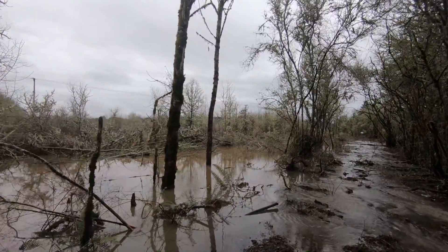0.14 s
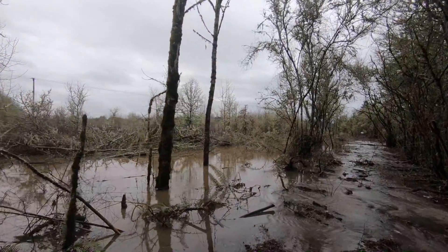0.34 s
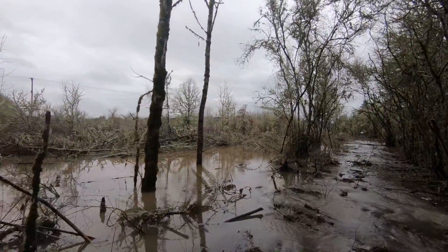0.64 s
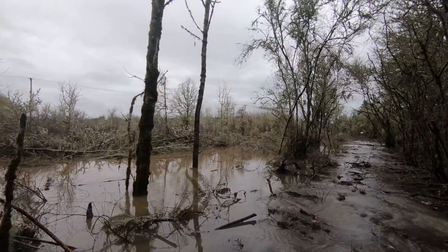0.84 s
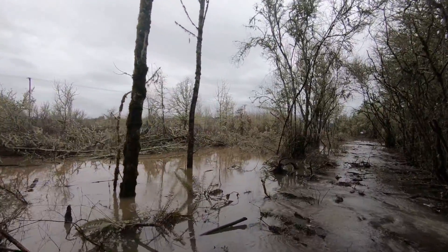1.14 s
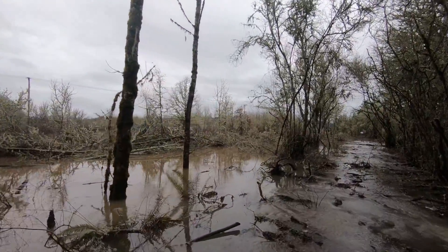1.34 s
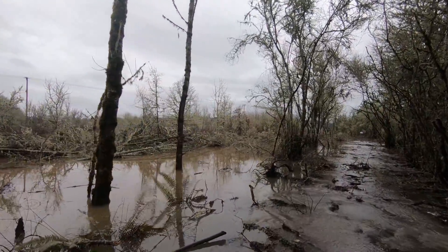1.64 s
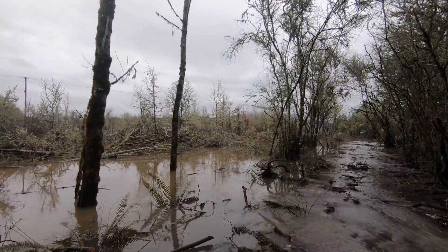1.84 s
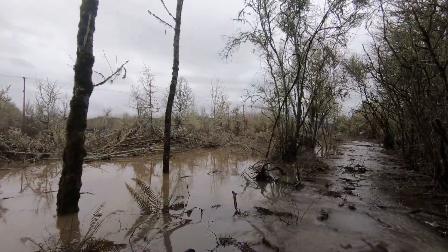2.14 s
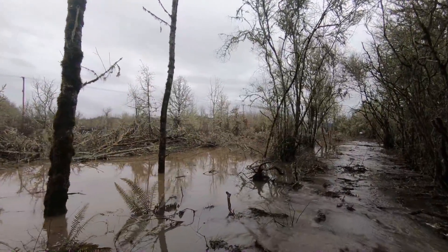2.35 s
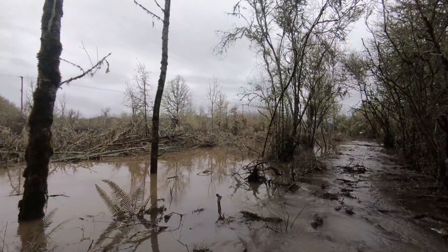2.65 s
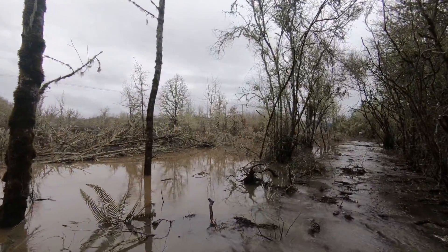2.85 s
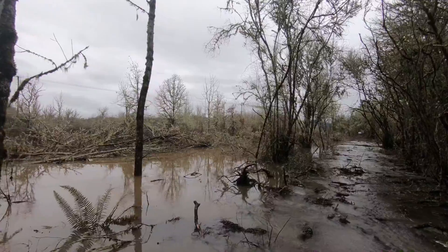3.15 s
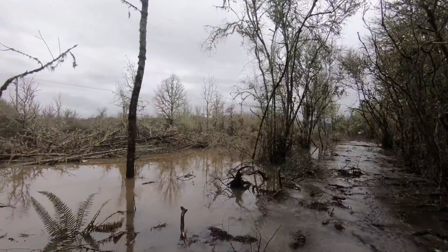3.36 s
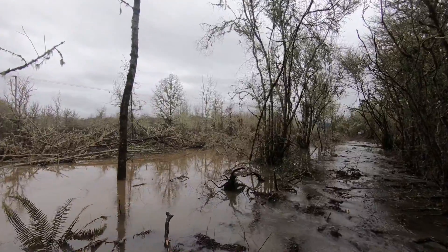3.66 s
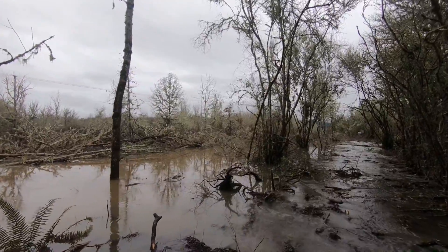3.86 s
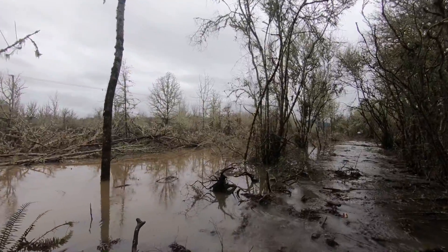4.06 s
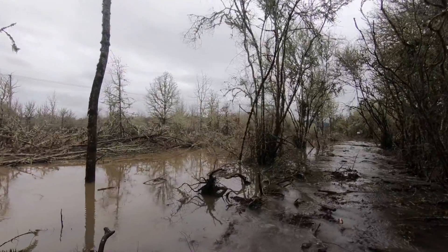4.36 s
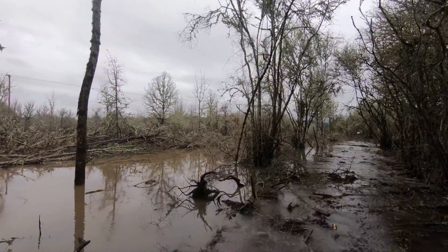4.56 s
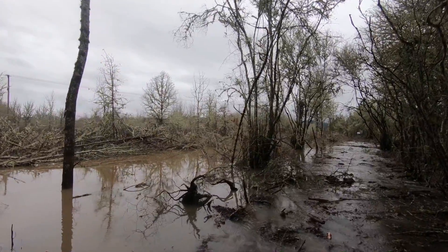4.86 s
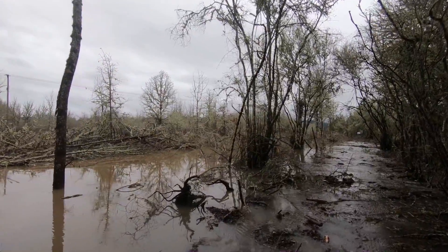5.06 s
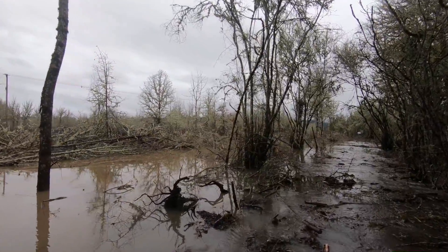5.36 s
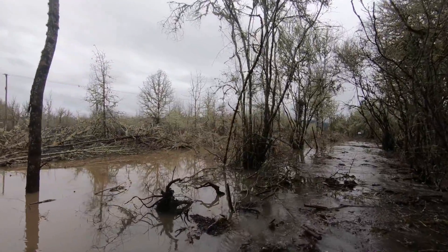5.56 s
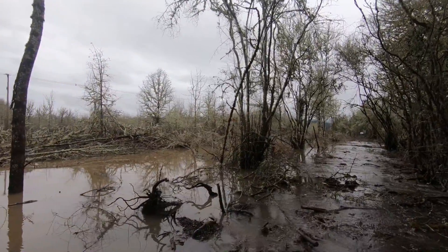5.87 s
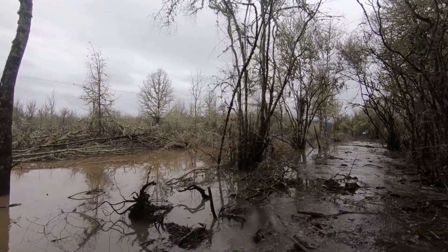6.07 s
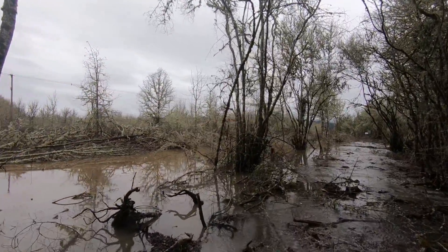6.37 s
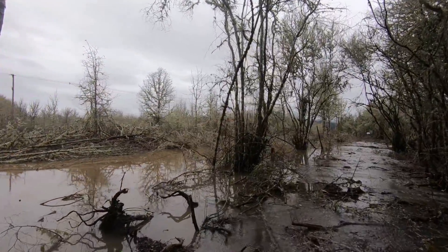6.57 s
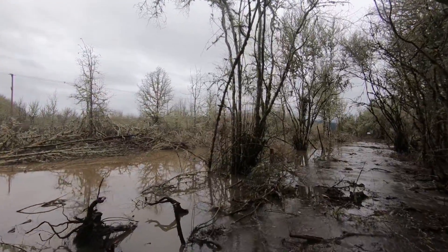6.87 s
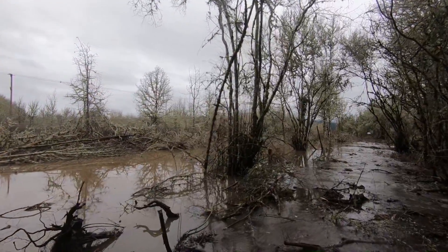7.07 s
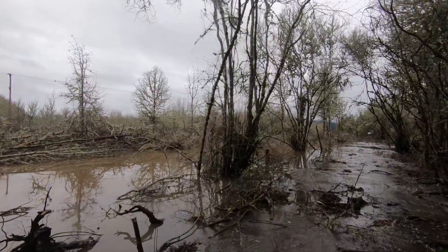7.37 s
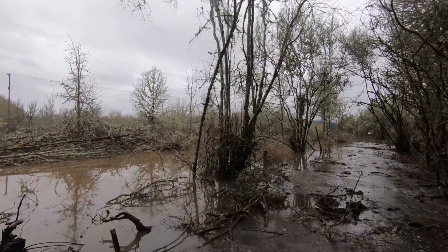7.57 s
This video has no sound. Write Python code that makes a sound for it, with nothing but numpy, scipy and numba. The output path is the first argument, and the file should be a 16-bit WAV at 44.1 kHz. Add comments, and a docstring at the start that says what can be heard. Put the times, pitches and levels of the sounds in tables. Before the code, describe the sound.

Someone wades along a flooded muddy path. Crisp splashes and wet slaps come in separate steps, with low thuds, gurgling slosh and small bubble pops. Quieter trickling fills the gaps, over soft wind and faint hiss. Splashing grows denser in the second half. A carried camera hears it close, slightly boxy, with dull highs and almost no stereo width.

```python
"""Water stirred by boots wading along a flooded, muddy path: crowds of damped sines make spray, gurgle and slosh.
Shaped noise bursts add slaps and mud thuds; single damped sines add bursting bubbles and sharp cracks of water.
Noise bands make soft swishes of cloth and trailing water, and wind with a far hiss fills the gaps.
The walker carries a small camera whose housing filters everything: dips near 560 and 1090 Hz,
a broad ring near 5 kHz and a dull top."""
import sys
import numpy as np
from scipy import signal
from scipy.fft import rfft, irfft
from scipy.io import wavfile
from scipy.ndimage import uniform_filter1d
from numba import njit

SR = 44100
rng = np.random.default_rng(int(sys.argv[2]) if len(sys.argv) > 2 else 0)


def generate_wav(signal):
    """Clip the signal to [-1, 1] and save it as 16-bit WAV at the path in sys.argv[1]."""
    frames = np.transpose(np.atleast_2d(signal))
    scaled = np.clip(frames, -1, 1) * 32767
    pcm = np.round(scaled).astype(np.int16)
    wavfile.write(sys.argv[1], SR, pcm)


N = 339989  # samples


def undb(db):
    """Level to amplitude: 20 dB for each factor of ten."""
    return 10 ** (np.asarray(db) / 20)


def unit(x):
    """Normalise the effective value (rms) to 1."""
    return x / np.sqrt(np.mean(x ** 2))


def on_log(table, hz):
    """Interpolate a spectrum (f/Hz, level/dB) linearly in level over log frequency."""
    f, db = np.transpose(table)
    return np.interp(np.log(np.maximum(hz, 1)), np.log(f), db)


def band(x, hz, width):
    """Band-pass filtering: keep the energy within width (Hz) around hz."""
    edges = np.clip([hz - width / 2, hz + width / 2], 15, 20000)
    sos = signal.butter(2, edges, "bandpass", fs=SR, output="sos")
    return signal.sosfilt(sos, x)


def walk(rate):
    """Slow random modulation: values held for 1 / rate seconds, smoothed twice, rms 1."""
    hold = int(SR / rate)
    held = np.repeat(rng.standard_normal(N // hold + 1), hold)[:N]
    return unit(uniform_filter1d(uniform_filter1d(held, hold), hold))


@njit
def rings(start, hz, t60, size, glide, rise, length):
    """Damped oscillation: sines decay exponentially while their pitch climbs by the share glide."""
    y = np.zeros(length)
    for k in range(len(start)):
        n = int(t60[k] * SR * .8)  # each ring stops after 48 dB of decay
        fade = np.exp(-np.log(1000) / (t60[k] * SR))
        gain, phase = size[k], 0.
        for i in range(min(n, length - start[k])):
            phase += 2 * np.pi * hz[k] * (1 + glide * i / n) / SR
            gain *= fade
            onset = min(1., i / (rise * n + 1))
            y[start[k] + i] += gain * onset * np.sin(phase)
    return y


def swarm(per_s, lo_hz, hi_hz, cycles, scatter_db, glide):
    """Superposition of many bubbles at random times, their starting pitches spread evenly in log frequency."""
    when, pitch, life, loud = rng.random((int(per_s * N / SR), 4)).T
    hz = lo_hz * (hi_hz / lo_hz) ** pitch
    steps = np.minimum(-np.log(1 - loud), 3)  # exponential: few bubbles are loud
    size = undb(scatter_db * steps) * np.sqrt(hz / lo_hz)
    t60 = cycles * (.5 + life) / hz  # 60 dB decay in about this many cycles
    start = (when * N).astype(np.int64)
    return unit(rings(start, hz, t60, size, 1. * glide, 0.04, N))


def pops(table, t60, glide, rise):
    """Impulse excitation: each row (t/s, level/dB, f/Hz) sets off one damped note."""
    s, db, hz = np.transpose(table)
    start = (s * SR).astype(np.int64)
    return rings(start, 1. * hz, np.full(len(s), t60), undb(db), 1. * glide, 1. * rise, N)


def bursts(table, share, t60, rise_s, edge_db):
    """Impact noise: each band of noise rises fast and decays exponentially, with a wide-band edge at the start."""
    out = np.zeros(N)
    t = np.arange(int(SR * .3)) / SR
    for s, db, hz in table:
        puff = unit(band(rng.standard_normal(len(t)), hz, share * hz))
        edge = rng.standard_normal(len(t)) * np.exp(-t / 0.0067)
        puff = puff + undb(edge_db) * edge
        puff = puff * (1 - np.exp(-t / rise_s)) * 1000 ** (-t / t60)
        i = int(s * SR)
        out[i:i + len(t)] += undb(db) * puff[:N - i]
    return out


def stirring():
    """Power addition of incoherent sources: swirl and surges set the levels/dB of spray, gurgle and slosh."""
    # water swirling round the legs: t/s, spray level/dB, gurgle level/dB, slosh level/dB
    swirl = [(0.0, -53, -62, -50), (0.45, -59.5, -70, -57.5), (1.22, -58.5, -78, -57.5),
             (1.46, -55, -65, -55.5), (1.8, -57, -60.5, -58), (2.1, -60.5, -70, -55.5),
             (2.602, -54.5, -57.5, -58.5), (3.2, -58, -61, -61.5), (3.4, -50.5, -54, -52.5),
             (3.98, -54, -58.5, -55.5), (4.15, -43.5, -51, -49), (4.48, -54, -57, -59.5),
             (4.66, -51.5, -54, -47.5), (5.07, -58, -59, -57.5), (5.28, -46, -80, -54.5),
             (5.66, -47, -50, -55), (5.86, -50.5, -55, -54), (6.27, -41.5, -49, -51),
             (6.57, -53.5, -56, -55.5), (6.97, -43, -62, -59), (7.12, -54, -53, -48.5),
             (7.27, -47.5, -54.5, -57), (7.71, -41, -49.5, -50.5)]
    # water pushed by a boot: start t/s, hold/s, spray level/dB, gurgle level/dB, slosh level/dB
    surges = [(0.026, 0.0026, -39, -47, -54), (0.508, 0.047, -44.5, -51, -61),
              (0.604, 0.054, -49.5, -52.5, -55), (0.72, 0.016, -42, -55, -52), (0.906, 0.01, -53, -68, -51),
              (1.243, 0.059, -45, -55.5, -57), (1.379, 0.019, -43.5, -53, -51),
              (1.84, 0.054, -50, -56, -55), (1.902, 0.0168, -49, -50.5, -47),
              (1.952, 0.0112, -46.5, -62, -53.5), (2.015, 0.0087, -47.5, -54, -57),
              (2.625, 0.021, -46, -47.5, -51.5), (2.738, 0.01, -53.5, -66, -53),
              (3.233, 0.092, -44.5, -54, -47), (4.057, 0.024, -41, -52.5, -44.5),
              (4.17, 0.13, -45, -51, -69), (4.276, 0.021, -43, -59.5, -62), (4.516, 0.041, -49, -51.5, -48),
              (4.566, 0.043, -61, -49, -47), (5.334, 0.034, -39, -46.5, -41.5),
              (5.41, 0.077, -46.5, -50, -44), (5.511, 0.094, -42.5, -48, -49),
              (5.866, 0.022, -43.5, -66, -59.5), (6.016, 0.0248, -43, -47, -44),
              (6.063, 0.052, -49.5, -48.5, -46), (6.268, 0.079, -40, -55, -66),
              (6.605, 0.0336, -41, -45, -50.5), (6.707, 0.049, -40, -50, -45),
              (6.8, 0.061, -39.5, -48, -50), (6.844, 0.043, -40.5, -44.5, -50),
              (6.918, 0.02, -49, -65.5, -44.5), (7.028, 0.0094, -61, -63, -56),
              (7.284, 0.0192, -39, -50, -56), (7.347, 0.03, -47, -61, -57),
              (7.451, 0.12, -42.5, -48.5, -49), (7.597, 0.05, -40, -53, -60)]
    rise_s, fall_s = 0.014, 0.04
    back_db, back_fall_s = -8, 0.037  # water running back, level relative to the main fall

    t = np.arange(0, N, 32) / SR  # control points
    s, *swirl_db = np.transpose(swirl)
    power = np.array([undb(2 * np.interp(t, s, db)) for db in swirl_db])
    for start, hold, *db in surges:
        after = np.maximum(t - start - rise_s - hold, 0)
        fall = np.exp(-after / fall_s) + undb(back_db) * np.exp(-after / back_fall_s)
        rise = np.clip((t - start) / rise_s, 0, 1)
        shape = rise * fall / (1 + undb(back_db))
        power += np.outer(undb(db), shape) ** 2
    return [np.interp(np.arange(N) / SR, t, 10 * np.log10(p)) for p in power]


def wading():
    """Bubble resonance: small bubbles ring high as spray, larger ones low as gurgle and slosh, in uneven gulps."""
    spray_db, gurgle_db, slosh_db = stirring()
    gulp = walk(45)

    # the finest mist flies mainly from hard splashes, so it grows faster than the spray
    mist_db = 1.8 * (spray_db + 40.5) - 45.0 + 2.7 * gulp
    mist = undb(mist_db) * swarm(6000, 8160, 19500, cycles=8.8, scatter_db=5.5, glide=0.054)

    fizz = undb(-6.5) * swarm(1100, 1882, 8460, cycles=82.0, scatter_db=4.5, glide=0.24)
    ticks = undb(-13) * swarm(70, 2500, 9000, cycles=14., scatter_db=3., glide=.05)
    crackle = undb(-8) * swarm(4000, 3440, 10000, cycles=9.8, scatter_db=0.0, glide=.05)
    sheet = undb(-6) * unit(band(rng.standard_normal(N), 5750, 7400))
    spray = undb(spray_db + 1.57 * gulp) * (fizz + ticks + crackle + sheet)

    gurgle = swarm(800, 458.0, 2740.6, cycles=22.6, scatter_db=3.5, glide=0.212)
    gurgle = undb(gurgle_db + 1.46 * gulp) * gurgle
    slosh = swarm(400, 49.2, 462, cycles=8.7, scatter_db=2.0, glide=0.239)
    slosh = undb(slosh_db + 1.54 * gulp) * slosh
    return mist + spray + gurgle + slosh


def air():
    """Turbulence noise: bands of wind and hiss swell together and flutter separately, the low ones most."""
    # relative spectrum of wind and far hiss ahead of the housing: f/Hz, level per Hz/dB
    air_spectrum = [(18, 10), (40, 9.5), (177, 5), (900, 5), (1500, 5), (2600, -7), (6000, -6.5),
                    (10000, -16.5), (12000, -34), (16000, -32)]
    out, gust = 0, walk(0.76)
    for hz in 25 * 2 ** np.arange(0, 9.4, .5):  # half-octave steps
        flutter_db = 3.1 * min(300 / hz, 1) + 1.7
        db = on_log(air_spectrum, hz) + 0.6 * gust + flutter_db * walk(9.8)
        # white noise keeps the per-Hz shape
        out = out + undb(db) * band(rng.standard_normal(N), hz, hz * 0.29)
    return undb(-53) * unit(out)


def slaps():
    """Impact noise of boots slapping the water and of flung drops: short, wide bands."""
    # slaps and drops ahead of the housing: t/s, level/dB, centre f/Hz
    slap_events = [(0.0425, -24, 5200), (0.473, -40.5, 5400), (0.5177, -35.5, 5330), (0.612, -37, 1920),
                   (0.705, -36.5, 5320), (0.735, -49, 5050), (0.7477, -30, 5240), (0.9167, -41, 3670),
                   (1.256, -33, 5410), (1.272, -31.5, 5210), (1.3054, -40, 5220), (1.3703, -36.5, 5380),
                   (1.3967, -29, 5300), (1.8763, -34.5, 5080), (1.9126, -30.5, 5640), (1.968, -36, 3400),
                   (2.642, -30.5, 3800), (3.2076, -42, 5000), (3.254, -22.5, 7500), (3.281, -27.5, 6900),
                   (3.3942, -37, 1610), (3.483, -40, 1600), (3.8546, -43, 5750), (3.9898, -39, 4730),
                   (4.0647, -30, 4870), (4.1794, -34, 5760), (4.209, -34, 5900), (4.2517, -33, 4970),
                   (4.3578, -33.5, 5540), (4.4413, -39, 5260), (4.521, -34.5, 5200), (4.6554, -37, 5390),
                   (4.679, -38, 5130), (4.7775, -39.5, 5240), (5.0448, -38.5, 3970), (5.243, -44, 3860),
                   (5.259, -40, 4800), (5.3268, -32, 4830), (5.3517, -30, 5030), (5.5169, -37, 4860),
                   (5.5613, -36, 5050), (5.671, -37, 2900), (5.882, -32.5, 5130), (5.8965, -41, 2670),
                   (5.9717, -35.5, 3430), (6.1225, -41, 1570), (6.2087, -35, 5740), (6.3366, -36.5, 2580),
                   (6.6209, -27, 2940), (6.734, -35, 4820), (6.8553, -32, 5710), (6.8796, -41.5, 2060),
                   (6.9272, -29, 4870), (7.0399, -35, 3400), (7.2863, -27.5, 5740), (7.314, -33, 5850),
                   (7.3736, -36, 4390), (7.434, -32, 2070), (7.5185, -24.5, 1720), (7.5588, -28.5, 1500),
                   (7.634, -26.5, 4680), (7.67, -26.5, 4700)]
    return bursts(slap_events, share=0.825, t60=0.036, rise_s=0.0029, edge_db=-3.5)


def cracks():
    """Impulse response of sharply struck water: a few milliseconds of damped ringing."""
    # sharp cracks of water, mostly at the peak of a slap, ahead of the housing: t/s, level/dB, starting f/Hz
    crack_events = [(0.0445, -26, 5300), (0.7562, -25, 5330), (1.3962, -42, 5260), (2.746, -32, 5050),
                    (3.256, -18, 5940), (3.8543, -31.5, 5650), (4.0347, -26.5, 6240), (4.1806, -24, 5730),
                    (4.2093, -20.5, 6000), (4.5221, -30.5, 5040), (5.242, -28, 3780), (5.355, -23, 5340),
                    (5.883, -26.5, 3810), (7.3158, -23.5, 5900), (7.635, -18.5, 4680)]
    return pops(crack_events, t60=0.0045, glide=.05, rise=0.0073)


def bubbles():
    """Bubble resonance: air pockets bursting from the mud sound a rising damped note with a tick of torn film."""
    # large single bubbles ahead of the housing: t/s, level/dB, starting f/Hz
    bubble_events = [(0.534, -38, 2410), (2.659, -33, 1700), (3.366, -41, 1590), (3.384, -39.5, 1470),
                     (3.395, -37, 1590), (3.442, -42, 1480), (3.489, -39, 1400), (4.089, -37, 2722),
                     (4.302, -36.5, 1590), (4.573, -34, 950), (4.599, -34.5, 930), (5.343, -37.5, 2130),
                     (5.354, -31.5, 1667), (5.462, -33, 800), (5.518, -36.5, 890), (5.541, -37, 860),
                     (5.589, -34, 716), (5.713, -35.5, 947), (5.897, -31.5, 2680), (6.042, -38, 2210),
                     (6.054, -38, 1250), (6.069, -31, 1550), (6.081, -33, 872), (6.114, -36, 1610),
                     (6.118, -34, 860), (6.131, -34.5, 1560), (6.268, -33, 3240), (6.336, -35, 2560),
                     (6.623, -28, 3060), (6.869, -30, 1500), (6.88, -30, 2047), (7.018, -38, 2358),
                     (7.285, -31, 2600), (7.434, -34, 2080), (7.474, -39, 1540), (7.496, -29.5, 880),
                     (7.519, -30, 1430), (7.534, -37.5, 2380), (7.559, -27.5, 1500)]
    # the film is higher and far shorter than the note
    films = [(s, db + 3.5, 1.86 * hz) for s, db, hz in bubble_events]
    notes = pops(bubble_events, t60=0.0247, glide=0.097, rise=0.0068)
    return notes + pops(films, t60=0.00247, glide=.05, rise=.01)


def thuds():
    """Low-frequency impact noise of heel thuds and mud sucks: narrower bands with a longer decay."""
    # thuds and sucks ahead of the housing: t/s, level/dB, centre f/Hz
    thud_events = [(0.602, -41, 161), (0.926, -42, 194), (1.908, -32, 169), (2.639, -50, 243),
                   (3.25, -33, 188), (3.286, -31, 196), (3.315, -42, 185.5), (4.03, -32.5, 160),
                   (4.079, -38.5, 168.4), (4.188, -25, 56.5), (4.514, -40, 241), (5.343, -31.5, 200),
                   (5.365, -25.5, 217), (5.444, -31.5, 223), (5.536, -37, 198), (6.016, -40, 159),
                   (6.619, -37.5, 160), (6.708, -38, 218), (6.749, -34, 161), (6.915, -27.5, 280),
                   (7.553, -33, 170)]
    return bursts(thud_events, share=0.42, t60=0.073, rise_s=0.00423, edge_db=-12)


def swishes():
    """Band-limited noise, swelling and fading as the root of a half sine."""
    # soft swishing bands, rustling cloth and water trailing off after slaps, ahead of the housing:
    # start t/s, end t/s, centre f/Hz, width/Hz, level/dB
    swish_bands = [(1.416, 1.5, 5900, 450, -59.5), (1.5, 1.644, 4600, 630, -62),
                   (1.776, 1.9, 4800, 400, -56.5), (1.37, 2.2, 6200, 2300, -55.5),
                   (3.4, 3.68, 5570, 600, -59.5), (1.5, 1.88, 1640, 700, -58.5),
                   (3.44, 3.72, 1660, 800, -56)]
    out, t = np.zeros(N), np.arange(N) / SR
    for start, end, hz, width, db in swish_bands:
        progress = np.clip((t - start) / (end - start), 0, 1)
        swell = np.sin(np.pi * progress) ** 0.5
        out += undb(db) * swell * unit(band(rng.standard_normal(N), hz, width))
    return out


def scene():
    """Linear superposition: all sources add, alike in both channels."""
    mono = wading() + air() + slaps() + cracks() + bubbles() + thuds() + swishes()
    return np.array([mono, mono])


def record(dry):
    """Linear filtering: a causal housing response, a faint random-phase stereo spread, a steep top cut."""
    # response of the camera housing: f/Hz, level/dB
    housing = [(15, -20), (55, -5), (110, -10.5), (160, 3), (280, -3), (350, -10.5), (480, -7.5),
               (560, -22.5), (680, -10), (870, -2.5), (1090, -13), (1300, -2.5), (1500, -2), (3800, -0.5),
               (5100, 4), (7200, -5.5), (11000, -26.5), (15500, -29)]
    # faint stereo spread, mostly treble: f/Hz, side minus mid level/dB
    spread = [(30, -46), (6000, -50.5), (9000, -17.5), (12000, -6)]
    size = 2048
    hz = np.arange(size // 2 + 1) * SR / size

    cepstrum = irfft(np.log(undb(on_log(housing, hz))))
    cepstrum[1:size // 2] *= 2  # folding the cepstrum makes the response causal
    cepstrum[size // 2 + 1:] = 0
    response = irfft(np.exp(rfft(cepstrum)))
    both = signal.fftconvolve(dry, response[None], axes=1)[:, :N]

    random_phase = np.exp(2j * np.pi * rng.random(len(hz)))
    spread_response = irfft(undb(on_log(spread, hz)) * random_phase)
    side = signal.fftconvolve(both[0], spread_response, "same")
    cut = signal.ellip(10, .2, 80, 15700, fs=SR, output="sos")  # low-pass edge in Hz
    return signal.sosfilt(cut, both + np.array([side, -side]))


dry = scene()
out = record(dry)
generate_wav(out)
```